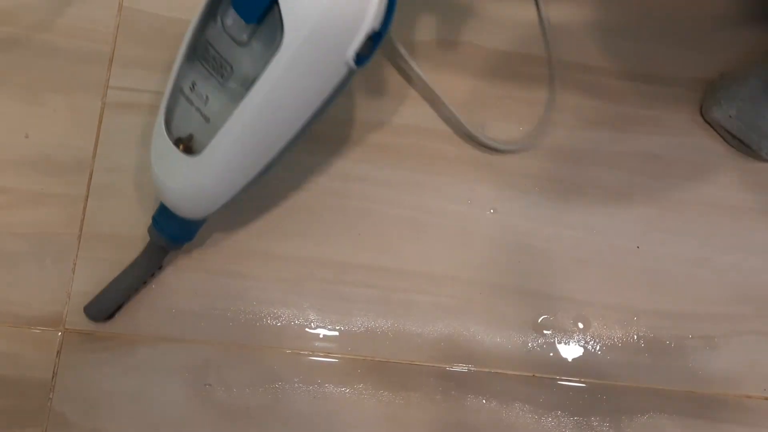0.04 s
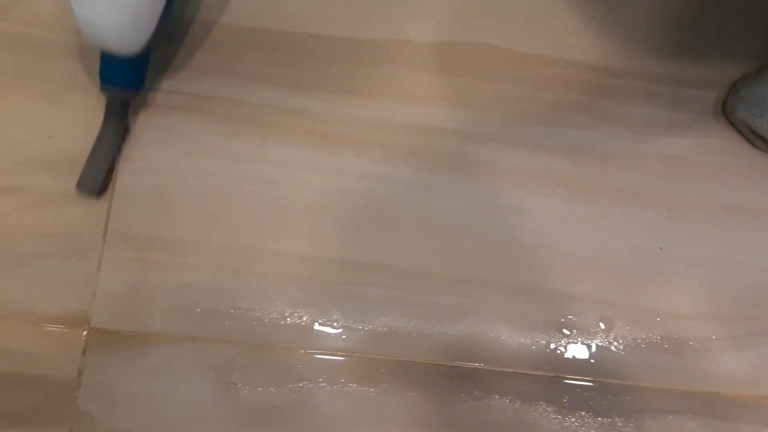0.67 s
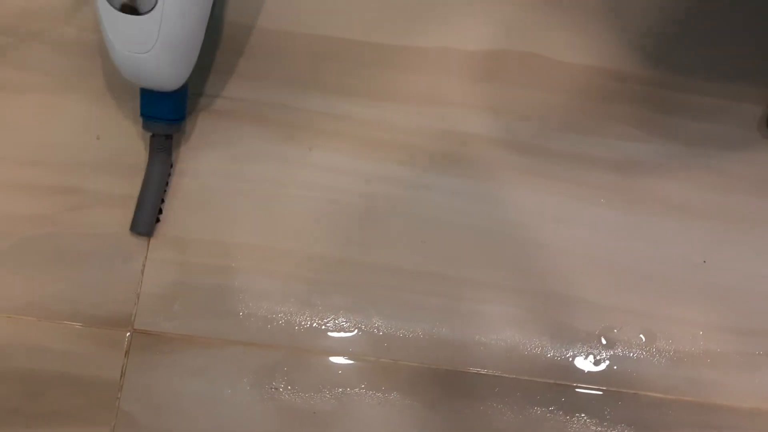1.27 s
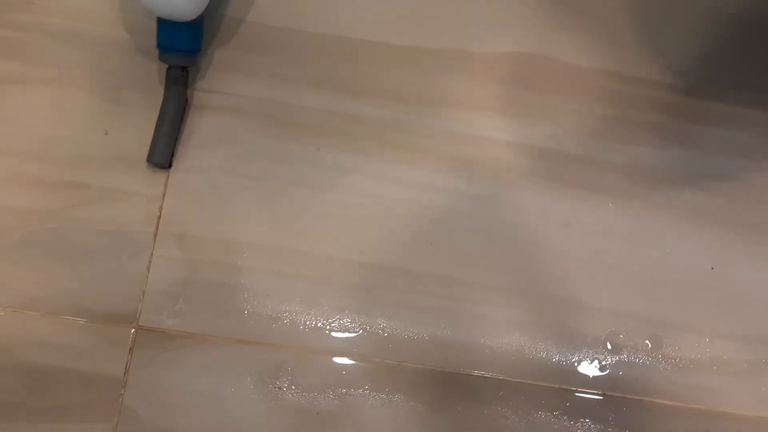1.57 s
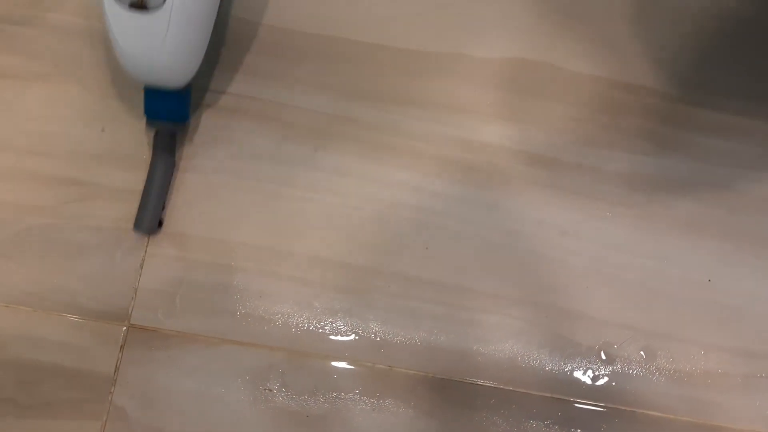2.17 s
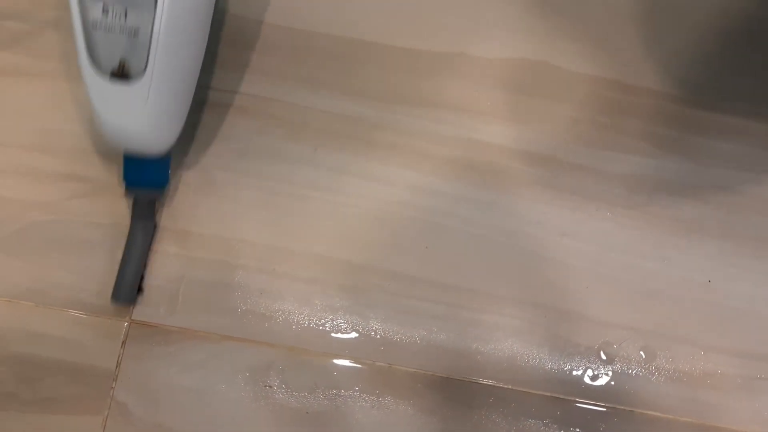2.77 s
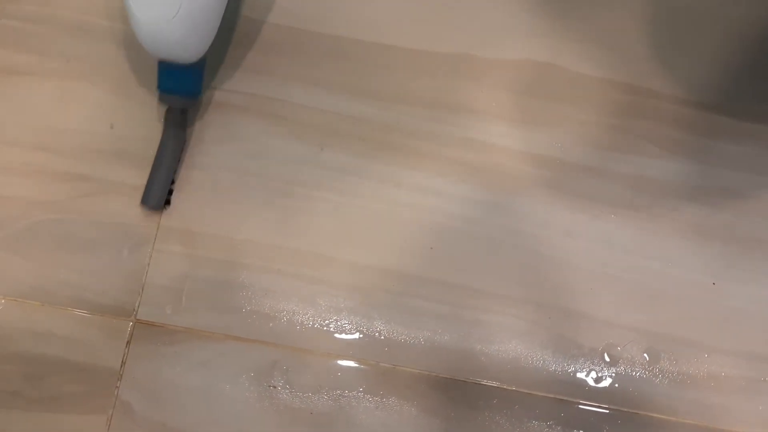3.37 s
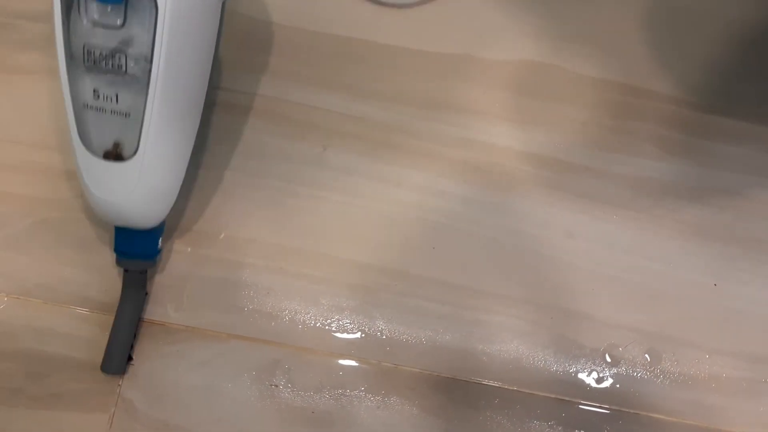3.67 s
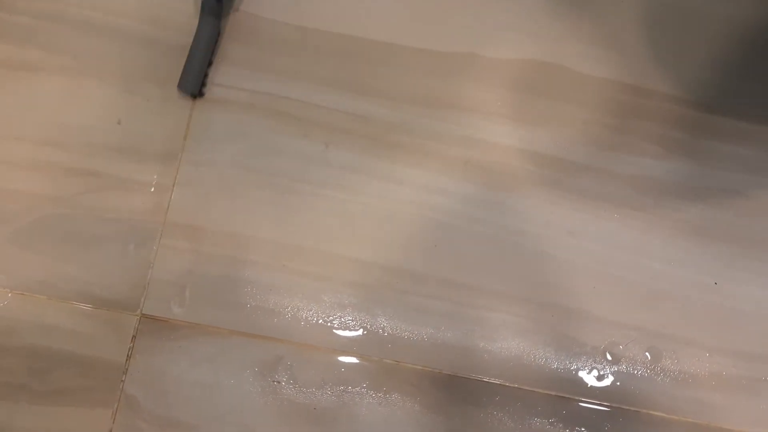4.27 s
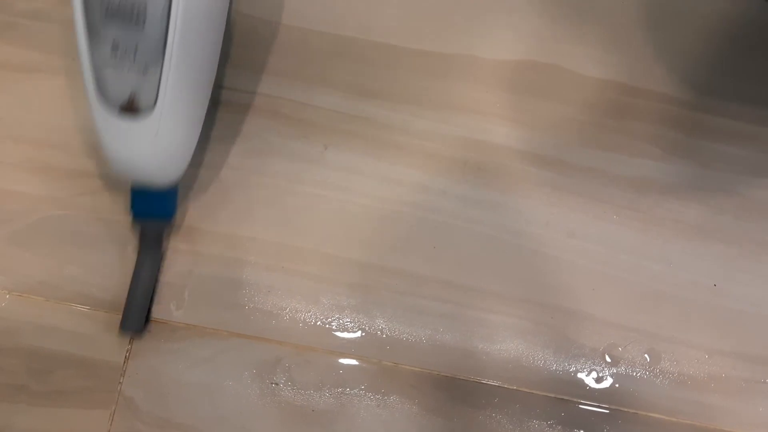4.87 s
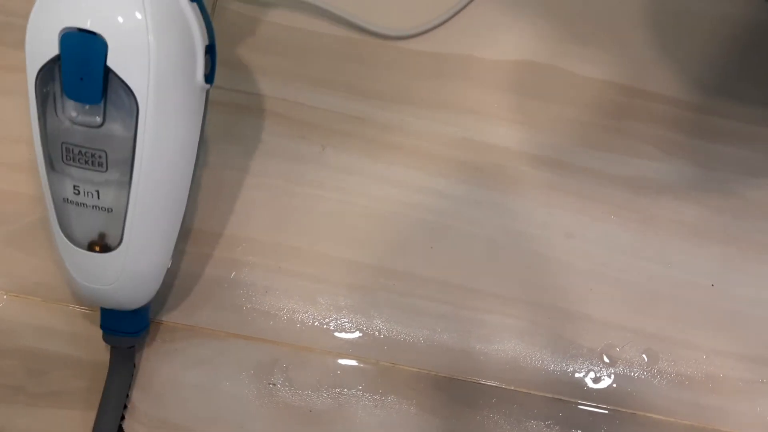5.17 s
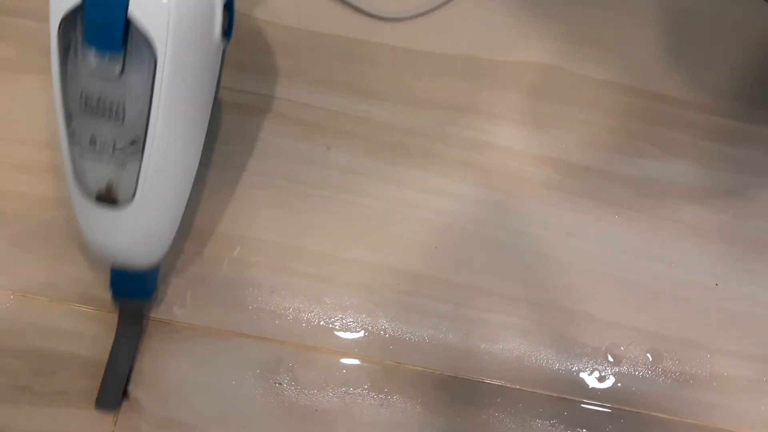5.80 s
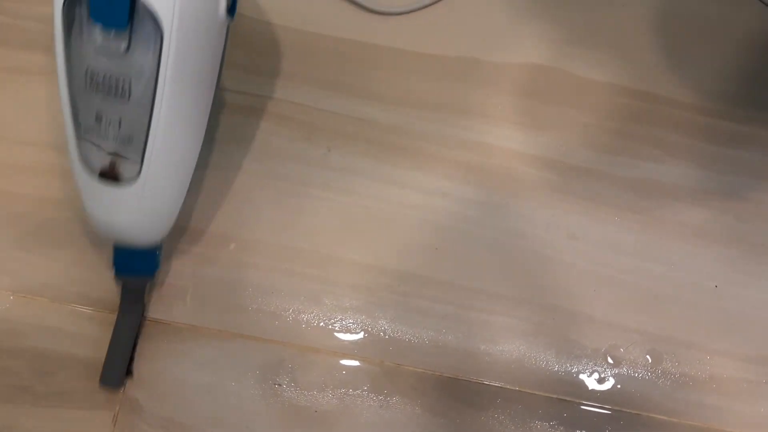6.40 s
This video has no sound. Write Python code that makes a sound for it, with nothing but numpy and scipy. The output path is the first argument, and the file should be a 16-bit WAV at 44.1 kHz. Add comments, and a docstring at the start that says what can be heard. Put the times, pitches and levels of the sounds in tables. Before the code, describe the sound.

A steam cleaner hisses steadily, its plastic nozzle clicking and rattling irregularly as it scrubs to and fro on a tiled floor.

```python
"""A hand-held steam cleaner on a tiled floor, close to a camera's stereo microphone in a small hard room.
It opens on a faint hum and steam hissing through the slanted plastic nozzle; the first stroke squeaks.
Within a second the nozzle swings upright and its air resonances glide. It then scrubs to and fro along
a joint to the end: the hiss brightens as the tip sweeps the wet tile, and the housing rattles wherever
the tip catches and lets go."""
import sys
import numpy as np
from scipy import signal
from scipy.fft import rfft, irfft, next_fast_len
from scipy.io import wavfile
from scipy.ndimage import uniform_filter1d, map_coordinates

SR = 44100
rng = np.random.default_rng(int(sys.argv[2]) if len(sys.argv) > 2 else 0)


def store_pcm(level_fs):
    """Save levels as 16-bit WAV."""
    pcm = np.round(np.clip(level_fs, -1, 1) * 32767).astype(np.int16)
    wavfile.write(sys.argv[1], SR, np.atleast_2d(pcm).T)


N = 288634
TIME = np.arange(N) / SR

# The room's low tone. Each row: frequency in Hz, relative level in dB.
ROOM_TONE = [(25, -47), (60, -2), (110, -2.5), (165, -9), (210, 1), (330, 7), (500, 2), (900, -26),
             (2000, -60)]
# Swells of a dull drone behind the cleaner. Each row: start in seconds, length in seconds, level in dB.
DRONES = [(0.24, 0.04, -62.5), (2.63, .05, -70), (3.096, 0.09, -57), (3.3, 0.24, -56)]
# The room's standing waves. Each row: frequency in Hz, width in Hz, gain in dB.
ROOM_MODES = [(118, 16, 5.5), (211.3, 8, 4), (233, 6.6, -5), (311.4, 16.5, 6.5), (408, 19, 5.5),
              (583.4, 6.1, 8.5), (873, 43, 5), (1116, 13, 3), (1264, 19, 3), (1430, 52, 5),
              (1980, 170, 1.5)]
# Reverberation of the hard walls. Each row: frequency in Hz, time to fall 60 dB in seconds.
ROOM_T60 = [(150, 0.061), (1000, 0.14), (4000, 0.081), (12000, 0.057)]
# Hiss reaching the microphone off the near walls. Each row: frequency in Hz, share of the power.
WALL_SHARE = [(400, .02), (1000, 0.23), (2000, 0.37), (3200, 0.54), (6000, 0.26), (15000, 0.21)]
# Likeness of the noise at the two microphone ports. Each row: frequency in Hz, correlation.
PORT_LIKENESS = [(100, 0.73), (400, 1), (1000, 0.92), (1800, 0.47), (2400, 0.22), (3000, 0.084),
                 (5000, 0.22), (8000, 0.08), (15000, 0.1)]
# Shading of the partly covered left port. Each row: frequency in Hz, left minus right in dB.
LEFT_SHADE = [(100, -3), (300, -0.5), (900, -4.5), (1100, -1.5), (1500, -2), (1950, -13), (2400, -7),
              (2750, -2.5), (3200, -7), (3600, -2), (4150, -12.5), (4600, -8), (5200, -11.5), (6000, -12),
              (7000, -16), (9500, -8.5), (11200, -9), (12800, -2.5), (15500, -7)]
# Two gliding hollows where sound cancels between the ports.
# Each row: time in seconds, centre in Hz, gain in dB of what the ports share.
UPPER_HOLLOW = [(0, 3000, -35), (.35, 2940, -18), (.57, 3200, -6), (.75, 3450, -9), (.9, 3580, -13),
                (1.25, 3510, -6), (1.9, 3450, -3), (4.1, 3720, -5.5), (4.38, 3620, -23), (4.7, 3620, -14),
                (5, 3680, -12), (5.42, 3830, -8), (5.9, 3870, -9), (6.4, 3700, -17)]
LOWER_HOLLOW = [(.5, 2600, 9), (.72, 2650, -10), (1, 2670, -5), (3.9, 2640, 0), (4.4, 2680, -22),
                (4.75, 2720, -1)]
# Dull rubs of the tip on the floor. Each row: start in seconds, length in seconds, level in dB.
RUBS = [(0.61, 0.27, -48.5), (2.16, 0.31, -55), (2.996, 0.084, -47.5), (3.78, 0.1, -54),
        (5.986, 0.1, -48.5)]
# Modes of the plastic housing. Each row: frequency in Hz, relative level in dB, t60 in seconds.
HOUSING_MODES = [(208, -21, 0.16), (324, -17.5, 0.078), (390, -16, 0.017), (660, -22, 0.016),
                 (838, -7.5, 0.033), (1120, -5.5, 0.034), (1444, -3.5, 0.035), (1835, 6, 0.024),
                 (2113, 3.5, 0.046), (2367, 6.5, 0.037), (2754, 5, 0.033), (3270, -1, 0.064)]
# The tip catches on the joint. Each row: start in seconds, relative level in dB as it sticks, hold in
# seconds, relative level in dB as it lets go, low body gain in dB, ring pitch in Hz, ring level in dB.
CATCHES = [(0.224, -14, 0.0082, -17.5, 3, 2320, 18.5), (0.588, -30, .005, -28, 1, 1410, 8),
           (0.688, -30, .005, -32, -5, 2050, 4), (0.849, -16.5, .008, -18.5, 1.5, 1960, 2),
           (1.377, -16.5, .012, -14, 0, 2100, 6), (1.402, -20, 0.0042, -23, 2, 2070, 4),
           (1.706, -19, 0.013, -22, -1, 2150, 15), (2.168, -20, .011, -16.5, -0.5, 2150, 4),
           (2.378, -20, 0.0039, -24.5, 0, 2190, -8), (2.667, -18, .008, -26, 2.5, 2050, 12),
           (3.052, -31, 0.0076, -29, -5, 2090, 3), (3.166, -19.5, .014, -19, 7, 2135, 11),
           (3.482, -16.5, .013, -15, -5, 2380, -1), (4.095, -19.5, .009, -24, 2, 2170, 2),
           (4.705, -15, .011, -15.5, 2, 1996, 15), (5.112, -14.5, 0.011, -16, -6, 1500, -3),
           (5.47, -27, 0.0073, -16, -5, 880, 2), (5.642, -25, 0.0086, -13.5, -3.5, 2500, 4),
           (6.206, -18.5, .009, -24.5, -5, 1960, 9)]
# The nozzle's angle to the floor. Each row: time in seconds, lean (0 upright, 1 slanted).
LEAN = [(0, 0.97), (.25, .93), (.52, 0.68), (.68, 0.052), (.95, -0.2), (1.6, -0.02), (2.2, 0.27),
        (2.8, 0.085), (3.2, 0.19), (3.6, -0.14), (4.1, 0.049), (4.7, 0.25), (5.2, -0.11), (6.5, 0.063)]
# The lowest air resonance moves as the tip meets the tile; the bright one climbs as the nozzle turns
# and grows as the tip seals. Each row: time in seconds, centre in Hz, lift in dB.
LOW_RESONANCE = [(0, 2340, 8), (.55, 2400, 7.5), (.68, 2180, 7), (.95, 2300, 6), (1.25, 2110, 6),
                 (2.3, 2170, 7), (2.9, 2180, 7.5), (3.8, 2260, 8.5), (4.4, 2190, 3.5), (4.9, 2210, 7.5),
                 (5.25, 2530, 7.5), (5.7, 2360, 7), (6.5, 2380, 3.5)]
BRIGHT_RESONANCE = [(0, 4600, 7), (.4, 4800, 10), (.8, 5100, 4.5), (1.1, 5170, 10.5), (1.75, 5150, 8.5),
                    (2.1, 5050, 5.5), (2.9, 5040, 8.5), (4.2, 5150, 7), (4.45, 5200, 5), (5.1, 5150, 8),
                    (5.4, 5140, 10), (5.65, 5150, 9.5), (6.5, 5100, 10.5)]
# Further air resonances, in the tube or between tip and tile. Each row: centre upright in Hz,
# centre slanted in Hz, width in Hz, lift upright in dB, lift slanted in dB.
NOZZLE_RESONANCES = [(2550, 2600, 440, 1.5, 4), (3040, 3300, 660, 0.5, -11), (3970, 3760, 230, 3, -12),
                     (4260, 3000, 250, 6.5, 12), (4640, 4200, 330, -3, -6), (5840, 4600, 300, -2, -4),
                     (6250, 5550, 330, 6, 6), (7100, 6560, 320, 2.5, 4.5)]
# Rush in the nozzle, jet on the tile, fizz of the spray. Each row: frequency in Hz, relative level in dB.
RUSH_SPECTRUM = [(60, -39), (170, -19), (210, -10), (350, -10), (600, -6), (1100, -4.5), (1750, -0.5),
                 (2300, 2), (2800, 2), (3400, 2.5), (4500, -5.5), (8000, -26)]
JET_SPECTRUM = [(1500, -40), (2900, -17), (3800, -2.5), (4700, -1), (6000, 0), (7200, 1), (8100, 1.5),
                (8800, -2.5), (9700, -7), (12000, -6), (16000, -40)]
FIZZ_SPECTRUM = [(6000, -48), (9000, -32), (10200, -2), (11300, 1.5), (12500, 0.5), (14000, 4),
                 (15700, 3.5)]
# The low part of the rush fills out and thins. Each row: time in seconds, gain in dB.
LOW_RUSH = [(0, 2), (.45, -0.5), (.7, 0), (1.6, .5), (2.5, 1), (2.85, -2), (3.1, 1.5), (3.5, 0),
            (3.72, -1.5), (4.1, -3.5), (4.5, -0.5), (4.9, 0), (6.5, -1.5)]
# Sweeps over the wet tile. Each row: start in seconds, length in seconds, jet lift in dB, fizz lift in dB.
SWEEPS = [(-0.12, 0.42, 3.5, 0.5), (0.243, 0.57, 3, 2), (0.727, .25, 1, 4.5), (0.997, 0.26, 0.7, 1),
          (1.286, 0.38, 0.5, 6.5), (1.66, 0.24, 1, 1.5), (1.983, 0.465, 2.5, 3), (2.9, 0.41, 4, 3),
          (3.783, 0.598, 5, 2.5), (4.543, 0.44, 1.5, 0), (5.157, 0.34, 3.5, 2.5), (5.46, 0.3, 1.5, 0.5),
          (5.955, 0.26, 3.5, 3)]

RUSH_DB, JET_DB, FIZZ_DB = -31, -27, -28  # the steam with the tip at rest
SPLUTTER_DB, CHOKE_DB, CHOKE_S = 8, 3.5, 0.019  # the hardest catch swells the rush and smothers the spray
RUSH_PER_JET, SHRILL_PER_JET = 0.097, 0.59  # dB of rush, and dB near 7 kHz, for each dB the jet gains
SWEEP_PUSH_S, SWEEP_SAG_PER_S = 0.43, 1.7  # after this long a sweep slackens, by this share a second
DIFFUSE_RESONANCE, WALL_RESONANCE = 0.26, 0.56  # share of the resonances' dB left in indirect sound
BODY_HZ, RING_T60_S = 900, 0.037  # a knock: upper edge of its low body, decay of its ring
BOUNCE_S, BOUNCE_SCATTER, BOUNCE_LOSS_DB = 0.007, 0.3, 8.5  # a bounce: flight, scatter as a share, loss


def amp(db):
    """Decibels to gain."""
    return 10 ** (np.asarray(db) / 20)


def unit(x):
    """Scale to rms 1."""
    return x / np.sqrt(np.mean(x ** 2) + 1e-20)


def along(points, hz):
    """Read (Hz, value) points on a log frequency axis."""
    freqs, values = np.transpose(points)
    return np.interp(np.log(hz + 1), np.log(freqs + 1), values)


def wobble(rate):
    """A smooth random curve, rate knots a second."""
    return map_coordinates(rng.standard_normal(int(N * rate / SR) + 4), [TIME * rate])


def swell(start, length, rise_s, fall_s):
    """An envelope that rises from the start, holds to the end of the length, then falls."""
    t = TIME - start
    return np.clip(t / rise_s, 0, 1) * np.clip(1 - (t - length) / fall_s, 0, 1)


def filtered(x, response):
    """Pass x through a complex response of frequency."""
    size = next_fast_len(N + SR // 2)
    return irfft(rfft(x, size) * response(np.fft.rfftfreq(size, 1 / SR)), size)[..., :N]


def narrow(hz, width):
    """Noise of rms 1 in one resonance, width as a share of its pitch."""
    return unit(filtered(rng.standard_normal(N), lambda f: 1 / (1 + ((f / hz - hz / (f + 1)) / width) ** 2)))


def noise(spectrum):
    """Coloured stereo noise of rms 1, alike in the bass and diffuse in the treble."""
    def shape(hz):
        spread = np.arccos(np.clip(along(PORT_LIKENESS, hz), -1, 1)) / 2
        return amp(along(spectrum, hz)) * [np.cos(spread), np.sin(spread)]
    mid, side = filtered(rng.standard_normal((2, N)), shape)
    return unit(np.array([mid + side, mid - side]))


def bell(hz, centre, width):
    """A resonance curve of height 1, per frequency and moment."""
    return 1 / (1 + (2 * (hz[:, None] - centre) / width) ** 2)


def glide(path, hz, t, width_hz):
    """Gain in dB of one peak or hollow that follows (seconds, Hz, dB) points."""
    times, centre, db = np.transpose(path)
    return np.interp(t, times, db) * bell(hz, np.interp(t, times, centre), width_hz)


def leaning(t, upright, slanted):
    """A value that follows the lean of the nozzle."""
    return upright + (slanted - upright) * np.interp(t, *np.transpose(LEAN))


def background(tone_db, drone_hz, hum_db):
    """The room behind the cleaner: low tone, a wavering mains hum and a drone that comes and goes."""
    hum = amp(hum_db + 3.6 * wobble(8.8)) * np.sin(2 * np.pi * 200 * TIME + 0.44 * wobble(13))
    swells = sum(amp(db) * swell(start, length, rise_s=0.048, fall_s=0.19) for start, length, db in DRONES)
    drone = np.sin(2 * np.pi * drone_hz * TIME + 0.98 * wobble(16)) + narrow(drone_hz, width=0.56)
    return amp(tone_db) * noise(ROOM_TONE) + hum + swells * drone


def standing_waves(x):
    """The room's modes lift or cut narrow bands of every sound and ring on after it."""
    mode = lambda f, centre, width: 1j * f * width / (centre ** 2 - f ** 2 + 1j * f * width)
    return filtered(x, lambda f: 1 + sum((amp(db) - 1) * mode(f, hz, width) for hz, width, db in ROOM_MODES))


def room_tail():
    """The walls' short stereo answer to a knock, energy about 1 a side."""
    hz, t, spectra = signal.stft(rng.standard_normal((2, SR // 3)), SR, nperseg=256)
    decay = amp(-60 * t / along(ROOM_T60, hz)[:, None])
    tail = signal.istft(spectra * decay, SR, nperseg=256)[1]
    return tail / np.linalg.norm(tail[0])


def reflections(hz, t, count=5):
    """Complex answer of the near walls at each port: its combs drift with the tip."""
    delay_s = rng.uniform(0.0015, 0.009, (count, 2, 1, 1))
    drift_s = rng.normal(0, 0.00005, (count, 1, 1, 1)) * map_coordinates(rng.standard_normal(16), [2 * t])
    phase = np.float32(2 * np.pi * hz[:, None]) * np.float32(delay_s + drift_s)
    return np.sqrt(2 / count) * (np.cos(phase).sum(axis=0) - 1j * np.sin(phase).sum(axis=0))


def microphone(pair):
    """The left port hears the floor first but is partly covered; in two hollows the shared sound cancels."""
    hz, t, spectra = signal.stft(pair, SR, nperseg=2048)
    shade = amp(along(LEFT_SHADE, hz))[:, None]
    lag_s = leaning(t, upright=0.00015, slanted=0.00014)
    late = np.exp(-2j * np.pi * hz[:, None] * lag_s)
    spectra = np.array([spectra[0] * shade, spectra[1] * late]) / np.sqrt((1 + shade ** 2) / 2)
    hollow_db = sum(glide(path, hz, t, width_hz=80) for path in (UPPER_HOLLOW, LOWER_HOLLOW))
    hollow_db *= np.exp(0.4 * np.interp(t, TIME, wobble(14)))  # the depth flickers
    spectra += spectra.mean(axis=0) * (amp(hollow_db) - 1)
    return signal.istft(spectra, nperseg=2048)[1][:, :N]


def squeaking(level_db):
    """A faint rough squeak as the first stroke pushes the tip along."""
    return amp(level_db) * swell(0, 0.246, rise_s=0.21, fall_s=0.03) * narrow(hz=663, width=0.065)


def rubbing():
    """The tip rubs dully on the tile where it is pressed down."""
    pressure = sum(amp(db) * swell(start, length, rise_s=0.031, fall_s=0.04) for start, length, db in RUBS)
    return pressure * narrow(hz=380, width=0.42)


def contacts():
    """Yield (seconds, dB, colour): each catch knocks as the tip sticks, lets go and bounces once."""
    flights = BOUNCE_S * np.exp(BOUNCE_SCATTER * rng.standard_normal(len(CATCHES)))
    for (start, stick_db, held, release_db, *colour), flight in zip(CATCHES, flights):
        yield start, stick_db, colour
        yield start + held, release_db, colour
        yield start + held + flight, release_db - BOUNCE_LOSS_DB, colour


def knock(body_db, ring_hz, ring_db, scrape, crack, attack_s):
    """One contact rings the housing and a pitch of its own, cracks, and scrapes over the grout."""
    t = np.arange(SR // 10) / SR
    hz, db, t60 = np.transpose(HOUSING_MODES)[:, :, None]
    strength, detune, phase = rng.standard_normal((3, len(HOUSING_MODES), 1))
    decays = amp(db + 1.7 * strength - 60 * t / t60)
    modes = np.sum(decays * np.sin(2 * np.pi * (hz * (1 + 0.013 * detune) * t + phase)), axis=0)
    ring = amp(ring_db - 60 * t / RING_T60_S) * np.sin(2 * np.pi * (ring_hz * t + rng.random()))
    grit_band = signal.butter(2, [250, 3800], "band", fs=SR, output="sos")
    grit = unit(signal.sosfilt(grit_band, rng.standard_normal(len(t))))
    friction = grit * (scrape * amp(-60 * t / 0.024) + crack * amp(-60 * t / 0.0037))
    blow = (modes + ring + friction) * (1 - np.exp(-t / attack_s))
    blow += (amp(body_db) - 1) * signal.sosfilt(signal.butter(1, BODY_HZ, fs=SR, output="sos"), blow)
    # a small body radiates no bass
    blow = signal.sosfilt(signal.butter(4, 150, "high", fs=SR, output="sos"), blow)
    return blow / np.std(blow[:SR // 200])


def rattles(level_db, room_db, drag_db):
    """The tip drags into each knock, heard close by and again from the walls."""
    track = np.zeros((2, N + SR))
    lead = SR // 40
    rasp_band = signal.butter(2, [400, 2600], "band", fs=SR, output="sos")
    for start, db, colour in contacts():
        rasp = unit(signal.sosfilt(rasp_band, rng.standard_normal(lead)))
        drag = rasp * amp(drag_db + np.linspace(-24, 0, lead))
        hit = knock(*colour, scrape=1.44, crack=2.7, attack_s=0.00034)
        direct = amp(db + level_db) * np.concatenate([drag, hit])
        heard = amp(room_db) * signal.fftconvolve(direct[None], room_tail(), axes=1)
        heard[:, :len(direct)] += direct
        first = round(start * SR) - lead
        track[:, first:first + heard.shape[1]] += heard
    return track[:, :N]


def air_resonances(hz, t, sway):
    """Lift in dB from the air in and under the nozzle: two peaks glide, the rest follow lean and sway."""
    shift = 1 + np.interp(t, TIME, sway)
    lift_db = glide(LOW_RESONANCE, hz, t, width_hz=450) + glide(BRIGHT_RESONANCE, hz, t, width_hz=480)
    for upright_hz, slant_hz, width, upright_db, slant_db in NOZZLE_RESONANCES:
        centre = leaning(t, upright_hz, slant_hz) * shift
        lift_db += leaning(t, upright_db, slant_db) * bell(hz, centre, width)
    return lift_db


def turbulence(spectrum, sway, patchy_db, ripple_db):
    """Flow noise with drifting eddies, coloured by the moving air resonances and near walls."""
    hz, t, spectra = signal.stft(noise(spectrum), SR, nperseg=2048)
    lift_db = air_resonances(hz, t, sway)
    walls = reflections(hz, t)
    direct = spectra.mean(axis=0)  # the sound common to both ports resonates most
    spectra = direct * amp(lift_db) + (spectra - direct) * amp(DIFFUSE_RESONANCE * lift_db)
    # part of the hiss arrives off the walls, with its own turn of phase at each port
    reflected = signal.stft(noise(spectrum)[0], nperseg=2048)[2] * amp(WALL_RESONANCE * lift_db)
    reflected = reflected * walls / (np.abs(walls) + 1e-9)
    share = np.clip(along(WALL_SHARE, hz), 0, 1)[:, None]
    spectra = np.sqrt(1 - share) * spectra + np.sqrt(share) * reflected
    eddies = uniform_filter1d(rng.standard_normal(spectra.shape[1:]), size=20, axis=0)
    eddies = uniform_filter1d(eddies, size=5, axis=1)
    gain = amp(patchy_db * unit(eddies) + ripple_db * walls.real)
    return unit(signal.istft(spectra * gain, nperseg=2048)[1][:, :N])


def flow():
    """Levels in dB of rush, jet and fizz: sweeps lift the hiss, catches briefly choke the spray."""
    slack = lambda start: np.clip(1 - SWEEP_SAG_PER_S * (TIME - start - SWEEP_PUSH_S), 0, 1)
    # the hand gathers speed slowly and stops quickly
    sweeps = [slack(start) * swell(start, length, rise_s=0.16, fall_s=0.024) for start, length, *_ in SWEEPS]
    jet_lift, fizz_lift = np.transpose(SWEEPS)[2:] @ np.array(sweeps)
    choke = sum(amp(max(stick_db, release_db)) * np.exp(-((TIME - start - held) / CHOKE_S) ** 2)
                for start, stick_db, held, release_db, *_ in CATCHES)
    choke /= choke.max()
    return (RUSH_DB + RUSH_PER_JET * jet_lift + SPLUTTER_DB * choke,
            JET_DB + jet_lift,
            FIZZ_DB + fizz_lift - CHOKE_DB * choke)


def steam():
    """Close up, the rush in the nozzle, the jet on the tile and the fine spray share one sputtering flow."""
    rush_db, jet_db, fizz_db = flow()
    sputter_db = 0.3 * wobble(45)
    sway = 0.005 * wobble(4.97)  # the hand sways the resonances by this share of their pitch
    gurgle_db = 0.8 * wobble(28)
    rush_gain = amp(rush_db + sputter_db + gurgle_db)
    rush = rush_gain * turbulence(RUSH_SPECTRUM, sway, patchy_db=1.5, ripple_db=2.5)
    jet_gain = amp(jet_db + sputter_db + 0.45 * wobble(40))
    jet = jet_gain * turbulence(JET_SPECTRUM, sway, patchy_db=1.77, ripple_db=2.0)
    fizz_gain = amp(fizz_db + sputter_db + 0.51 * wobble(35))
    fizz = fizz_gain * turbulence(FIZZ_SPECTRUM, sway, patchy_db=2.0, ripple_db=3.0)
    shrill = filtered(jet, lambda hz: np.exp(-((hz - 7000) / 1000) ** 2))
    shrill_db = SHRILL_PER_JET * (jet_db - jet_db.mean())  # a harder jet is also shriller
    low = filtered(rush, lambda hz: 1 / (1 + (hz / 1500) ** 6))
    low_db = np.interp(TIME, *np.transpose(LOW_RUSH))
    return rush + jet + fizz + shrill * (amp(shrill_db) - 1) + low * (amp(low_db) - 1)


def scene():
    """The cleaner close by and the room behind it, at the microphone's two ports."""
    squeak = squeaking(level_db=-41.5)
    cleaner = steam() + squeak + rubbing() + rattles(level_db=-3.5, room_db=-6.0, drag_db=-14.0)
    room = background(tone_db=-59.5, drone_hz=113, hum_db=-64.0)
    return microphone(standing_waves(cleaner + room))


def record(dry):
    """The camera keeps nothing above its band limit."""
    return filtered(dry, lambda hz: hz < 15850)


dry = scene()
out = record(dry)
store_pcm(out)
```